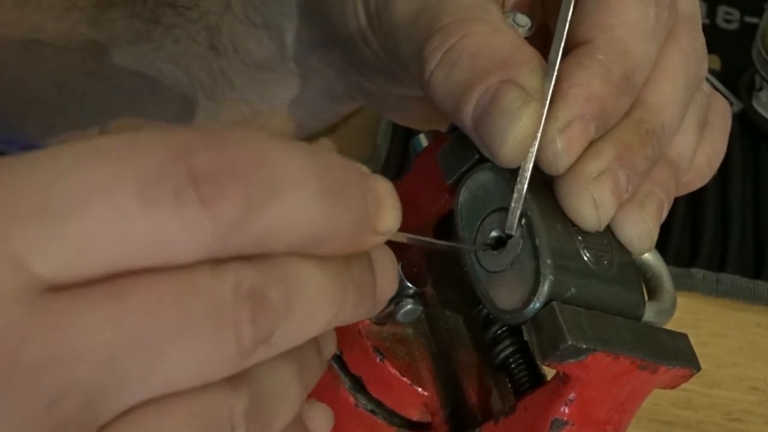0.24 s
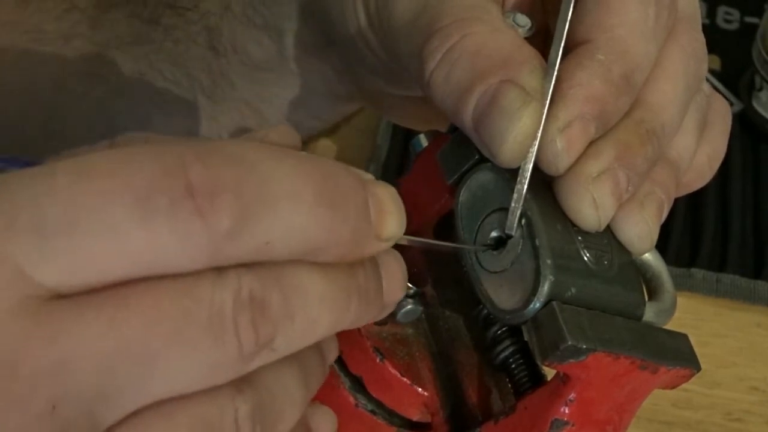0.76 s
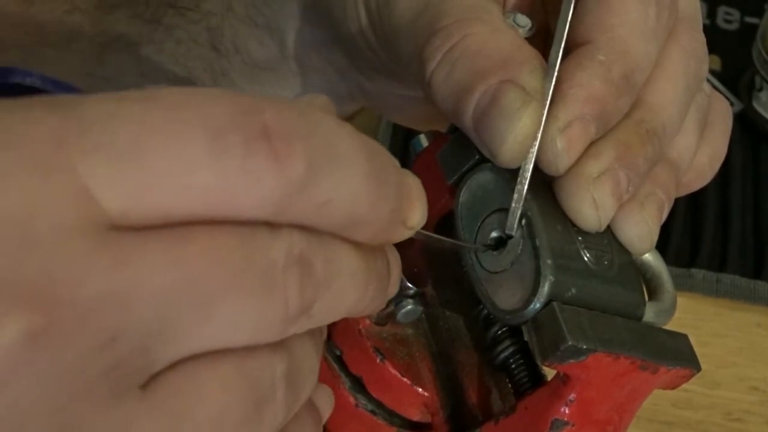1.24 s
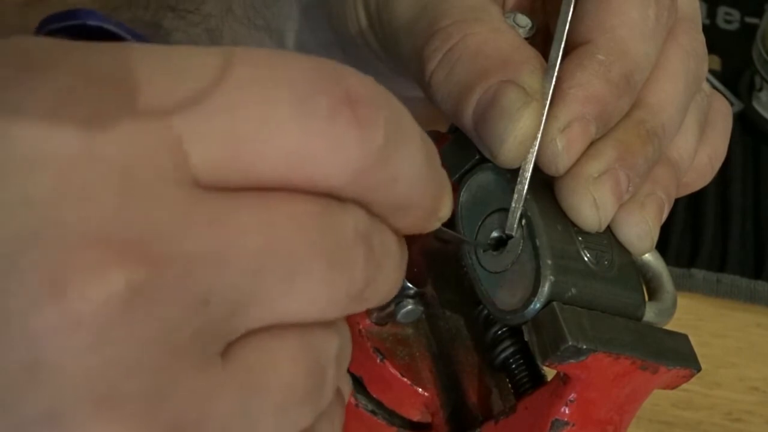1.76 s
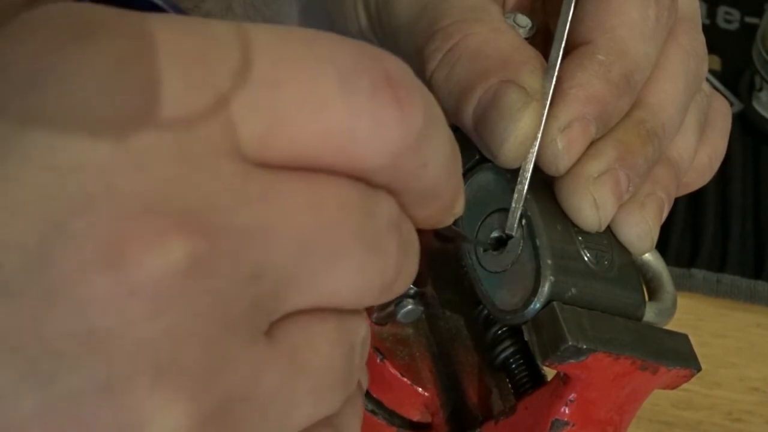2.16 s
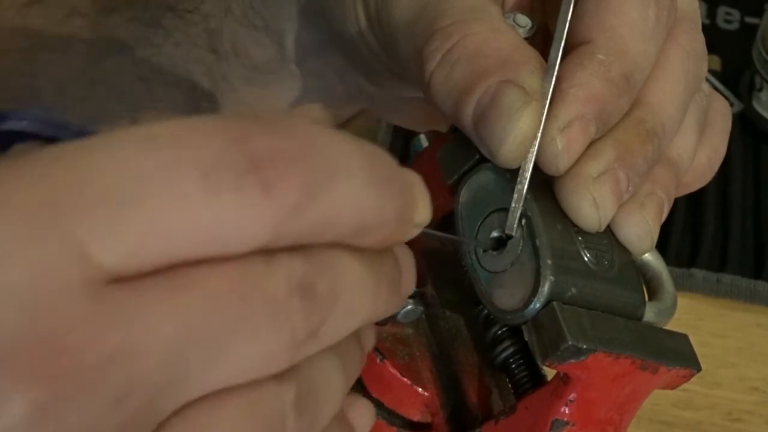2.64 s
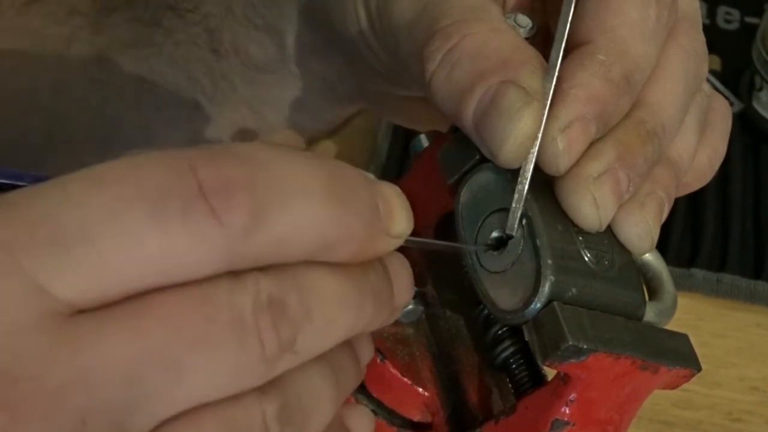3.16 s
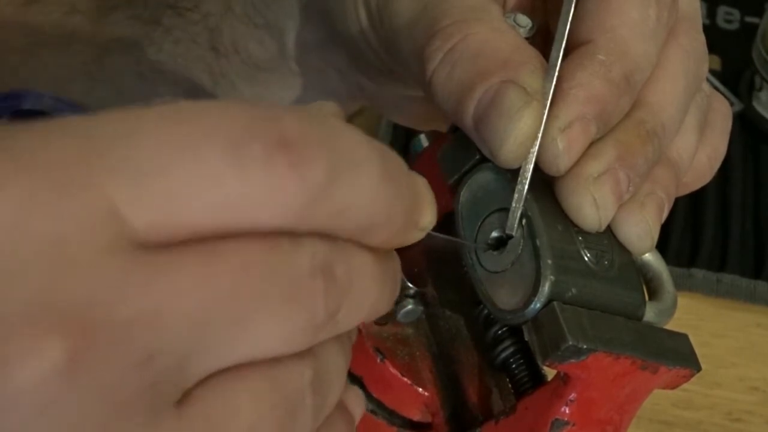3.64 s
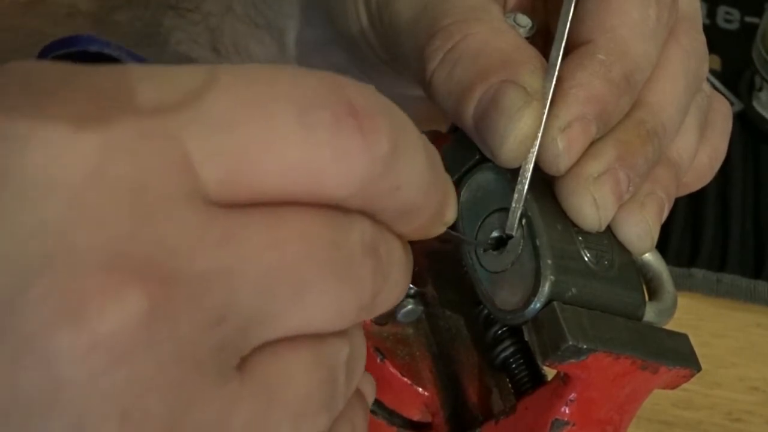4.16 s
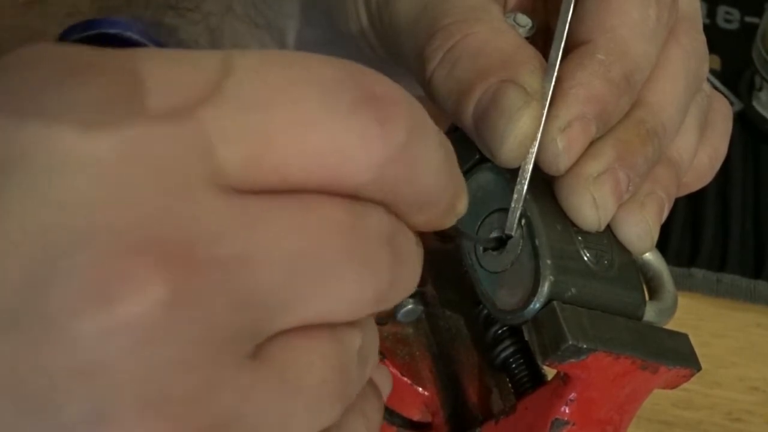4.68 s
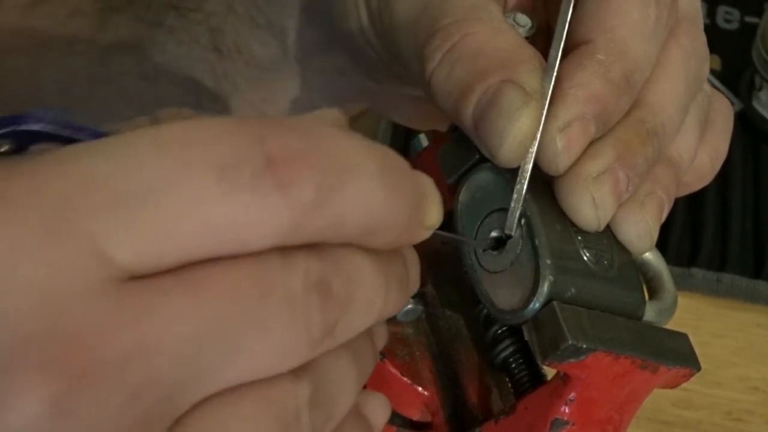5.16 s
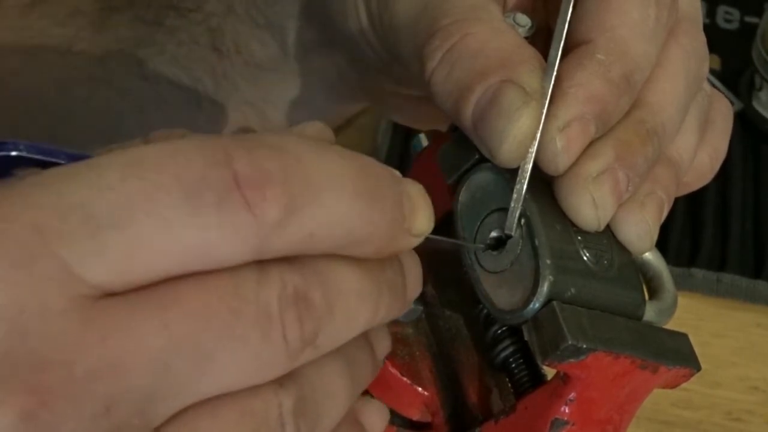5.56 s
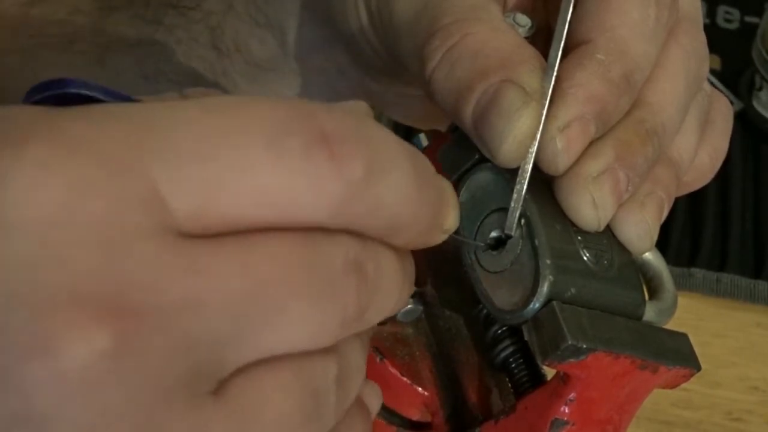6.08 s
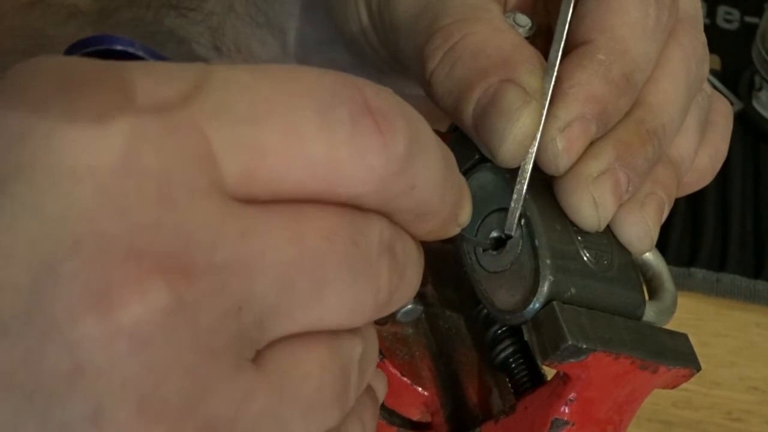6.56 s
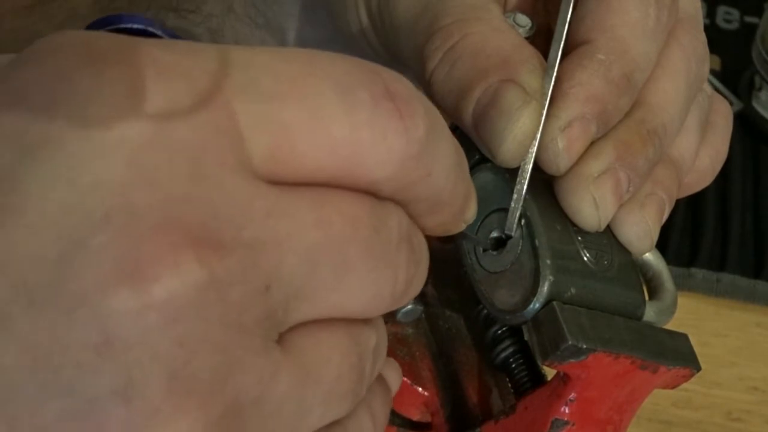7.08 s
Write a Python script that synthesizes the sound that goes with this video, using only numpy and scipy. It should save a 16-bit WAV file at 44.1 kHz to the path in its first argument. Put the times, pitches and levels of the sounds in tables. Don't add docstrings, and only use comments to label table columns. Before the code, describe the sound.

Close stereo pickup of a thin pick working inside a padlock held in a bench vise. A sharp pair of clicks opens, then quieter ticks and soft hand thumps, a dull distant knock, one hard bright click, scattered touches, and a final tight burst of loud clicks. A small hard room adds brief hissy tails over quiet air, low rumble and a wavering motor hum.

```python
import sys
import numpy as np
from scipy import signal
from scipy.fft import rfft, irfft
from scipy.io import wavfile
from scipy.ndimage import uniform_filter1d

SR = 44100
rng = np.random.default_rng(int(sys.argv[2]) if len(sys.argv) > 2 else 0)


def boost(x):
    u = np.asarray(x, float) / 20
    return 10 ** u


def materialize(psi):
    bounded = np.clip(np.atleast_2d(psi).T, -1, 1)
    quanta = np.round(bounded * 32767).astype(np.int16)
    wavfile.write(sys.argv[1], SR, quanta)


N = 322812


def evened(x):
    return x / np.sqrt(np.mean(x ** 2) + 1e-20)


def read(points, hz):
    f, value = np.transpose(points)
    return np.interp(np.log(hz + 1), np.log(f + 1), value)


def add(mix, s, sound):
    part = mix[..., round(s * SR):][..., :sound.shape[-1]]
    part += sound[..., :part.shape[-1]]


def panned(x, pan_db):
    return x * boost(np.array([[0.5], [-0.5]]) * pan_db)


def causal(db):
    mirrored = np.r_[db, db[-2:0:-1]]
    log_gain = np.log(boost(np.maximum(mirrored, -90)))
    pulse = np.fft.ifft(np.exp(np.conj(signal.hilbert(log_gain)))).real[:900]
    return pulse / abs(pulse).max()


def ring(modes, rise_s, scatter_db):
    t = np.arange(SR // 3) / SR
    tones = np.zeros(len(t))
    for hz, db, t60 in modes:
        level_luck, phase_luck = rng.standard_normal(2)
        decay = boost(db + scatter_db * level_luck - 60 * t / t60)
        tones += decay * np.sin(2 * np.pi * hz * t + 1.6 * phase_luck)
    out = tones * (1 - np.exp(-t / max(rise_s, 1e-4))) ** 2
    return out / abs(out).max()


# (time [s], snap level [dB], brightness tilt [dB per octave], left-right [dB], room share [dB])
PIN_CLICKS = [(0.387, -49.5, -0.5, 6, 3.5), (0.425, -29, 1.1, 0, 2.6), (0.5811, -50.5, -1.5, 3, 5.5),
              (2.287, -56, -6.5, 6, -5), (2.459, -69, -1, 3, 0.1), (2.501, -54.5, 2.5, -3, 6),
              (2.5883, -42.5, 0.5, -1.5, 6), (4.6942, -24, 1.1, 2.5, 3.5), (5.0001, -63, -1.2, -7, 13),
              (5.4677, -37, 3.5, 0, 2.5), (6.106, -60, -1, 3, 3.5), (6.761, -64, -4, -2, -2),
              (7.1814, -38, 0.4, 0, 5), (7.2578, -46, -7.5, 1, -3), (7.2685, -20, 2, 1, 6.5),
              (7.2703, -19, 1, 1, -7), (7.2748, -28.5, -1.5, 1, 8.5), (7.2844, -31.5, -3.2, -4, -2),
              (7.2964, -20.5, 1.5, 2, 12.5)]
# (until [s], [(frequency [Hz], level [dB per Hz])])
PIN_COLOURS = [
    (.41, [(880, -48), (1500, -13), (2640, -11), (3310, -15), (3880, -3.5), (6830, -13), (8240, -7), (16000, -40)]),
    (1.5, [(470, -33), (965, -18), (2150, -16), (2630, -4), (2910, -14.5), (7000, -15), (13400, -24.5), (16000, -27.5)]),
    (3.5, [(470, -35), (907, -12.5), (1080, -2), (1240, -17), (2730, -10.5), (3220, -10.5), (8230, -13.5), (16000, -29)]),
    (4.85, [(400, -20), (1750, -3), (3000, -12), (6400, -10.5), (7620, -20), (13700, -19.5), (14900, -16), (16000, -34)]),
    (6.9, [(470, -47), (930, -5), (1500, -8), (2700, -4), (7500, -13), (10000, -23), (13500, -13.5), (16000, -30.5)]),
    (7.22, [(470, -36), (900, -10.5), (2380, -16), (2730, 1), (3180, -9.5), (5720, -15), (12000, -18), (16000, -33)]),
    (9.5, [(350, -27.5), (900, -6), (2200, -4), (2610, -13), (5190, -4.5), (8160, -4), (9110, -10), (15600, -17)]),
]


def clicks():
    near, far = np.zeros((2, N)), np.zeros(N)
    hz = np.fft.rfftfreq(2048, 1 / SR)
    decay = boost(-60 * np.arange(900) / SR / 0.0045)
    for s, snap_db, tilt_db, pan_db, room_db in PIN_CLICKS:
        shared, left, right = rng.standard_normal((3, 900)) * decay
        chatter = np.array([shared + 0.54 * left, shared + 0.71 * right])
        chatter /= np.linalg.norm(chatter[0])
        colour = next(points for until, points in PIN_COLOURS if s < until)
        pulse = causal(read(colour, hz) + tilt_db * np.log2((hz + 100) / 5000))
        tick = 1.82 * signal.fftconvolve(chatter, pulse[None])[:, :900]
        add(near, s - 0.0003, panned(boost(snap_db + 5.5) * tick, pan_db))
        add(far, s, boost(snap_db + room_db + 7) * pulse)
    return near, far


# (time [s], level [dB], frequency [Hz], t60 [s])
PIN_NOTES = [(0.385, -50, 8300, 0.006), (0.4239, -29, 5050, 0.006), (0.4265, -25.5, 4570, 0.0067),
             (2.501, -48, 5100, 0.0054), (2.5883, -29, 4950, 0.0071), (4.6938, -18.5, 5390, 0.006),
             (5.4677, -36, 4760, 0.012), (7.1816, -35, 4270, 0.006), (7.2678, -9.5, 5380, 0.0054),
             (7.2695, -15.5, 8320, 0.0071), (7.295, -17, 5100, 0.0056)]


def pin_notes():
    out = np.zeros(N)
    for s, db, hz, t60 in PIN_NOTES:
        add(out, s, boost(db - 8.5) * ring([(hz, 0, t60)], rise_s=0.0001, scatter_db=0))
    return out


# (time [s], level [dB], frequency [Hz], t60 [s], singing mode relative level [dB])
BLADE_TWANGS = [
    (0.4277, -35.5, 2650, 0.025, -18),
    (.582, -63, 2740, 0.027, -11),
    (2.46, -59, 2800, .03, -35),
    (2.504, -54.5, 2790, 0.041, -35),
    (2.59, -44, 2820, 0.034, -22),
    (4.6952, -37, 2160, 0.017, -45),
    (4.697, -40.5, 1735, 0.071, -40),
    (5.47, -46, 2744, 0.03, -19),
    (7.185, -48.5, 2750, .02, -6),
    (7.274, -31.5, 3200, 0.036, -28),
]
# (frequency ratio, level [dB])
BLADE_MODES = [(0.947, 3), (0.999, 6.5), (1.038, -5)]


def twangs():
    out = np.zeros(N)
    for s, db, hz, t60, sing_db in BLADE_TWANGS:
        modes = [(hz * ratio, mode_db, t60) for ratio, mode_db in BLADE_MODES]
        modes.append((hz * 1.004, sing_db, 0.61))
        add(out, s, boost(db) * ring(modes, rise_s=0.00035, scatter_db=0))
    return out


# (frequency [Hz], level [dB], t60 [s])
BENCH_DEEP = [(103, -7, 0.14), (158.6, -2.5, 0.15), (198.8, 4.5, 0.14)]
BENCH_MIDDLE = [(254, -4, 0.068), (293, 6, 0.097)]
BENCH_MAIN = [(341.7, -2, 0.096), (390.5, 1, 0.11), (438.8, -1, 0.11)]
BENCH_UPPER = [(618, 5.5, 0.13), (765.5, -11.5, 0.27), (1025, 1, 0.051)]
# (time [s], level [dB], deep modes relative level [dB], upper modes relative level [dB])
VISE_JOLTS = [(0.393, -45.5, -14, -11), (0.404, -41, -26, -9), (0.425, -37.5, -19, -6),
              (0.444, -43, -15, -2.5), (2.506, -52, -15, -22), (2.589, -42, -10.5, -12),
              (2.619, -53, 3.5, -6), (2.662, -58, -16, -19), (4.692, -35, -9, -14), (4.701, -29.5, -8, -16),
              (4.719, -35, -20, -10), (4.777, -44, -10, -15), (5.479, -39.5, -13.5, -7.5),
              (5.525, -51, -23, -27), (7.186, -44, -30, -6), (7.206, -50, -22, -12), (7.25, -45, -13, -11),
              (7.277, -27, -12.5, -8.5), (7.293, -28.5, -29, -12)]
# (time [s], level [dB], deep modes relative level [dB], upper modes relative level [dB])
HAND_PUSHES = [(0.37, -57.5, -3.5, 0), (0.554, -51, -17, -22), (0.574, -44, -19, -16),
               (0.599, -47, -15.5, -6.5), (2.286, -40.5, -4, -28), (2.308, -43.5, -5, -27),
               (2.336, -50, -1, -20), (2.371, -45, -23, -15), (3.171, -47, -11, -14),
               (3.193, -50, -11, -24), (3.321, -54.5, -20, -11), (4.248, -54.5, -11, -8),
               (4.322, -50, -10, -8), (4.364, -55, -9, -12), (5.04, -44, -11, -8), (5.074, -46.5, -28, -19),
               (5.094, -45, -10.5, -14), (5.444, -54.5, 1.5, -11), (5.708, -54, -12, -15),
               (5.736, -50.5, -4, -14)]


def thumps(blows, rise_s, middle_db):
    out = np.zeros(N)
    for s, db, deep_db, upper_db in blows:
        sound = ring(BENCH_MAIN, rise_s, scatter_db=3)
        sound += boost(deep_db) * ring(BENCH_DEEP, rise_s, scatter_db=1)
        sound += boost(upper_db - 2.5) * ring(BENCH_UPPER, rise_s, scatter_db=-1)
        sound += boost(middle_db) * ring(BENCH_MIDDLE, rise_s, scatter_db=-2.5)
        add(out, s - 0.003, boost(db - 1.5) * sound)
    return out


def bench_thumps():
    jolts = thumps(VISE_JOLTS, rise_s=0.0021, middle_db=-20)
    return jolts + thumps(HAND_PUSHES, rise_s=0.0023, middle_db=-20.5)


# (time [s], level [dB], room share [dB])
DULL_KNOCKS = [
    (3.035, -41, 0.5),
    (3.044, -37.5, 2.5),
    (3.054, -44.5, 3),
]
# (frequency [Hz], level [dB per Hz])
DULL_COLOUR = [(120, -44), (200, -21), (286, 3.5), (440, -8), (518, -1), (719, -8.5), (982, -10.5),
               (1160, -9), (1360, -17), (2040, -16), (4100, -32), (5600, -45), (9100, -69), (15400, -120)]


def knocks():
    near, far = np.zeros((2, N))
    colour = boost(read(DULL_COLOUR, np.fft.rfftfreq(2048, 1 / SR)))
    n = np.arange(2048)
    for s, db, room_db in DULL_KNOCKS:
        burst = rng.standard_normal(2048) * boost(-60 * n / SR / 0.031)
        burst *= np.minimum(n / 130, 1) ** 2
        burst = irfft(rfft(np.roll(burst, 60)) * colour)
        blow = np.roll(irfft(colour), 100)[:600]
        add(near, s, boost(db + 2.5) * burst / abs(burst).max())
        add(far, s, boost(db + room_db) * blow / abs(blow).max())
    return near, far


# (delay [s], level [dB])
NEAR_ECHOES = [(.0023, -5), (.0046, -5), (.0068, -9.5), (.0085, -12.5), (0.0095, -18.5)]


def echoed(x):
    out = x.copy()
    for s, db in NEAR_ECHOES:
        for side in (0, 1):
            delay_s = s * rng.uniform(0.9, 1.05)
            add(out[side], delay_s, boost(db) * rng.choice([-1, 1]) * x[side])
    return out


# (frequency [Hz], t60 [s])
ROOM_DECAY = [(150, 0.58), (400, 0.56), (1000, 0.7), (2000, 0.67), (4000, 0.53), (8000, 0.58),
              (16000, 0.26)]
# (frequency [Hz], level [dB])
TAIL_COLOUR = [(150, -0.5), (500, -1.5), (1500, 0.5), (4000, -2.5), (7000, -5), (10000, -1), (15800, 4),
               (16100, -20)]
# (frequency [Hz], shared part over own part [ratio])
TAIL_SHARED = [(200, 4.7), (700, 2.3), (3000, 0.69), (12000, 0.097)]


def room(x, start_s=0.0016, build_s=0.0041):
    size = SR * 2 // 3
    taps = rng.choice([-1.0, 1.0], (3, size)) * (rng.random((3, size)) < 0.3)
    hz, t, z = signal.stft(taps, SR, nperseg=256)
    shared = read(TAIL_SHARED, hz)[:, None]
    z = (z[:2] + shared * z[2]) / np.sqrt(1 + shared ** 2)
    z *= boost(read(TAIL_COLOUR, hz)[:, None] - 60 * t / read(ROOM_DECAY, hz)[:, None])
    tail = signal.istft(z, SR, nperseg=256)[1][:, :size]
    tail *= 1 - np.exp(-np.maximum(np.arange(size) / SR - start_s, 0) / build_s)
    return signal.fftconvolve(x[None], tail / np.linalg.norm(tail[0]), axes=1)[:, :N]


# (frequency [Hz], level [dB per Hz])
AIR_COLOUR = [(35, -34), (60, -4), (71, -9), (113, -18.5), (146, -9.5), (173, -15.5), (194, -18),
              (358, -14.5), (393, -8), (509, -16), (894, -13), (982, -18), (3250, -22.5), (15000, -35),
              (16500, -72)]
# (centre [Hz], width [Hz], level [dB])
AIR_BUMPS = [(100, 15, -0.5), (296, 29, -0.5), (1230, 260, -2), (1840, 340, 3), (13100, 1900, -2.5)]
# (frequency [Hz], correlation [-1 to 1])
AIR_LIKENESS = [(60, 1.0), (150, 0.84), (380, 0.44), (950, -0.11), (2380, -0.071), (5980, -0.19),
                (15000, 0.13)]
# (frequency [Hz], left over right [dB])
AIR_BALANCE = [(60, -1), (180, -1.5), (550, 2.5), (1650, 1.5), (4970, 1), (15000, 0.5)]


def room_tone():
    frames, hz = N // 512 + 5, np.fft.rfftfreq(2048, 1 / SR)
    a, b, c, d, patches = rng.standard_normal((frames, 1025, 5)).T
    patches = uniform_filter1d(patches, 20, 0)
    patches = evened(uniform_filter1d(patches, 10, 1))
    same = np.clip(read(AIR_LIKENESS, hz), -1, 1)[:, None]
    left = a + 1j * b
    right = same * left + np.sqrt(1 - same ** 2) * (c + 1j * d)
    z = np.array([left, right])
    bumps_db = sum(db * np.exp(-((hz - centre) / width) ** 2) for centre, width, db in AIR_BUMPS)
    colour_db = read(AIR_COLOUR, hz) + bumps_db
    z *= boost(colour_db[:, None] + 1.12 * patches) * (hz > 65)[:, None]
    z *= boost(np.array([0.5, -0.5])[:, None, None] * read(AIR_BALANCE, hz)[:, None])
    return boost(-64) * evened(signal.istft(z, nperseg=2048, noverlap=1536)[1][:, :N])


def bench_drone():
    noise = rng.standard_normal(N)
    modes = ring(BENCH_MAIN, rise_s=0, scatter_db=0)
    return boost(-75.5) * evened(signal.fftconvolve(noise, modes)[:N])


# (time [s], level [dB])
RUMBLE_LEVEL = [(0.0, -74), (0.5, -68), (1.3, -65.5), (1.5, -64), (2.4, -62.5), (2.55, -71), (2.9, -68.5),
                (3.1, -61), (3.5, -66.5), (3.65, -70), (4.3, -71), (4.43, -79), (4.56, -65), (5.2, -73),
                (5.4, -67), (7.32, -70.5)]


def rumble():
    noise = rng.standard_normal(N)
    throb_band = signal.butter(2, [40, 48], "bandpass", fs=SR, output="sos")
    wash_band = signal.butter(1, [18, 62], "bandpass", fs=SR, output="sos")
    throb = signal.sosfilt(throb_band, noise)
    wash = signal.sosfilt(wash_band, noise[::-1])
    times, levels = np.transpose(RUMBLE_LEVEL)
    level_db = np.interp(np.arange(N) / SR, times, levels) - 1.5
    return boost(level_db) * evened(evened(throb) + 0.87 * evened(wash))


# (middle [s], half length [s], level [dB])
HUM_SWELLS = [(.4, 0.13, -73.5), (.65, 0.088, -72), (1.12, 0.11, -64.5), (1.33, 0.16, -74.5),
              (1.67, 0.076, -72), (2.05, 0.14, -71), (2.27, 0.14, -67.5), (2.733, 0.16, -71.5),
              (3.118, .08, -69.5), (3.597, 0.25, -72.5), (4.58, 0.14, -68), (5.34, 0.13, -64),
              (6.082, 0.17, -69.5), (6.518, 0.19, -66.5)]
# (order, level [dB])
SHAFT_ORDERS = [(1, -78), (2, -79), (4, -80), (5, -83), (6, -82)]


def hum():
    t = np.arange(N) / SR
    level = boost(-78.5)
    for s, half_s, db in HUM_SWELLS:
        level = level + boost(db) * np.exp(-((t - s) / half_s) ** 2)
    out = level * np.sin(2 * np.pi * 145.4 * t)
    turns = t * 49.1
    for order, db in SHAFT_ORDERS:
        waver_db = 0.83 * np.sin(turns / (9 + order) + order)
        out += boost(db + waver_db) * np.sin(2 * np.pi * order * turns)
    return np.sqrt(2) * out


def scene():
    lock, lock_far = clicks()
    pins = pin_notes()
    pick = twangs()
    knock, knock_far = knocks()
    bench = bench_thumps()
    into_room = lock_far + boost(-33) * pins + boost(-6.5) * pick + boost(-8) * bench + boost(6) * knock_far
    tail = room(into_room)
    direct = echoed(lock + pins) + pick + bench + knock
    background = room_tone() + bench_drone() + rumble() + hum()
    return direct + tail + background


def top_cut(x):
    return signal.sosfilt(signal.butter(12, 16610, fs=SR, output="sos"), x)


def record(dry):
    edge = signal.firwin(255, 16450, window=("kaiser", 8), fs=SR)
    mix = signal.oaconvolve(dry, edge[None], "same")
    return top_cut(mix)


dry = scene()
out = record(dry)
materialize(out)
```